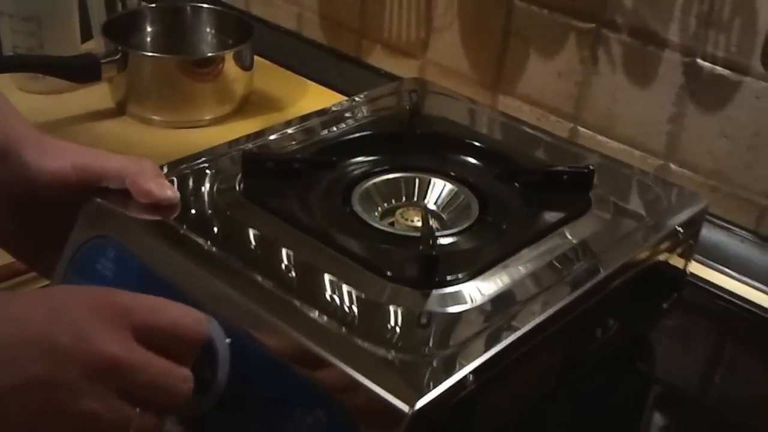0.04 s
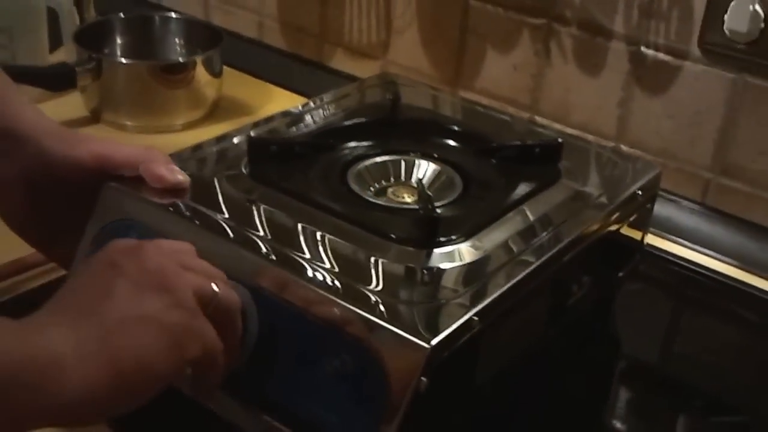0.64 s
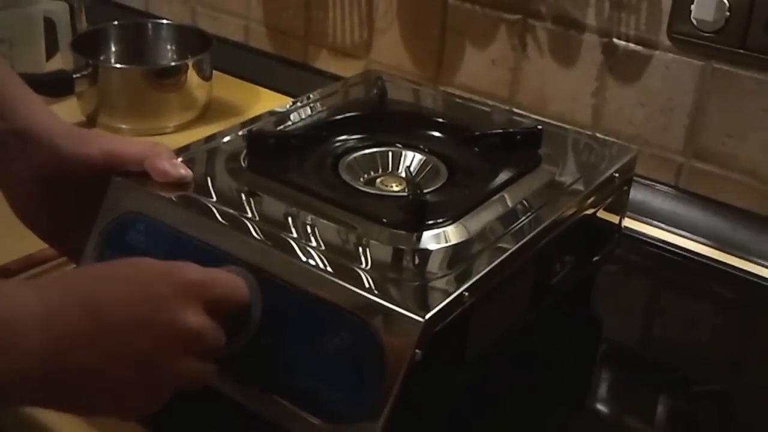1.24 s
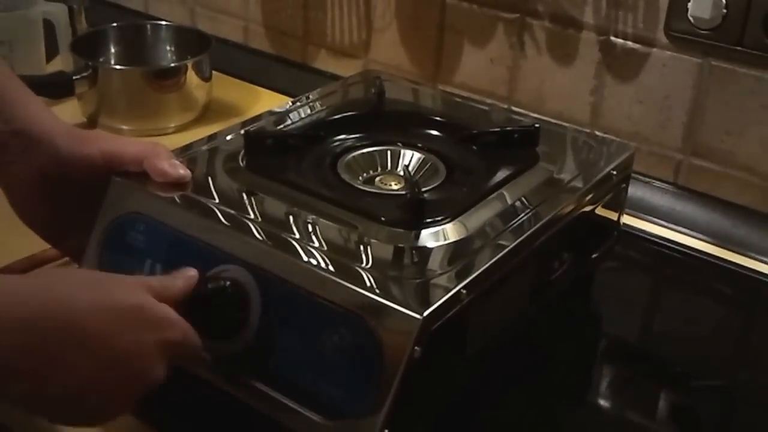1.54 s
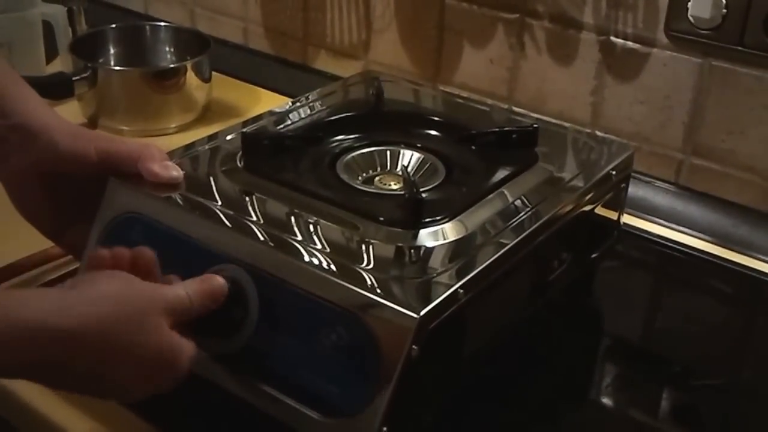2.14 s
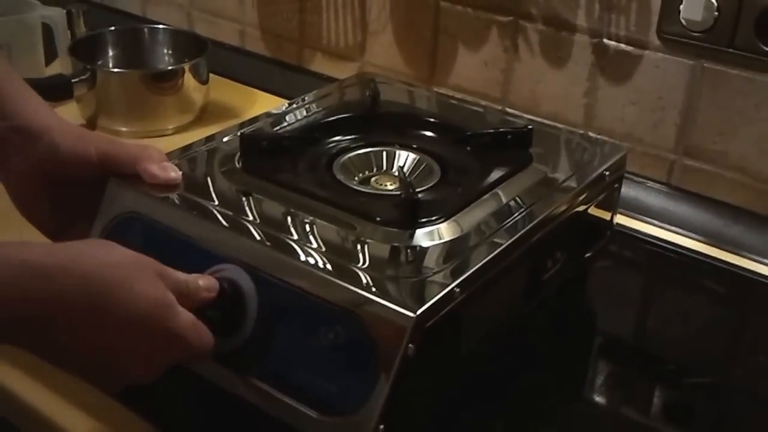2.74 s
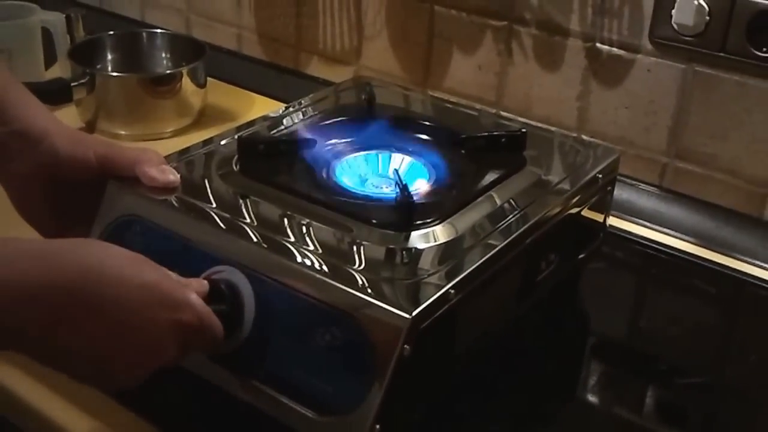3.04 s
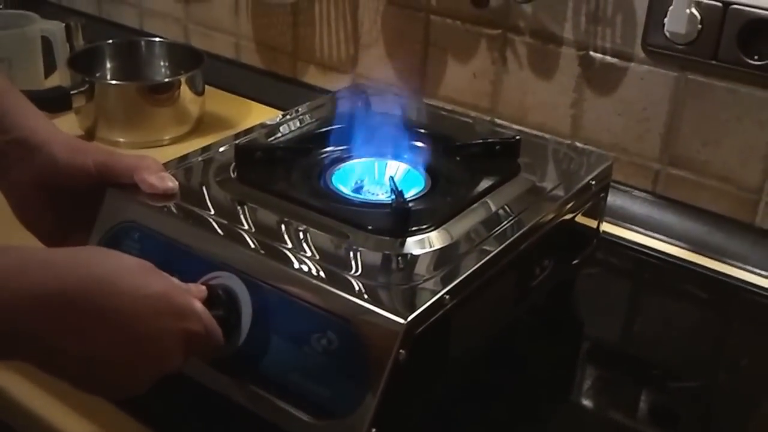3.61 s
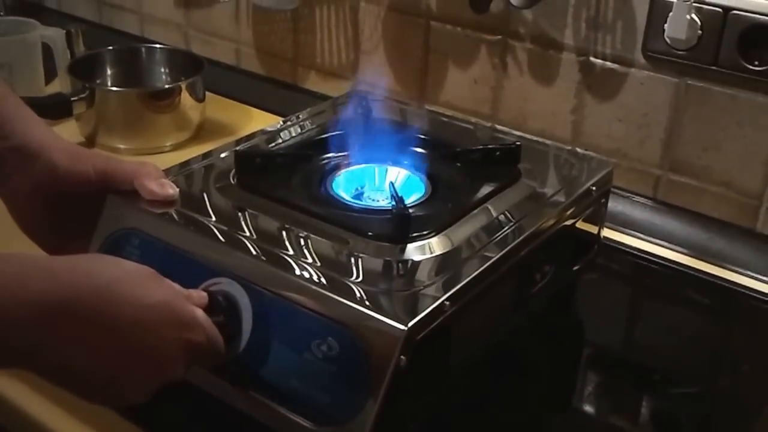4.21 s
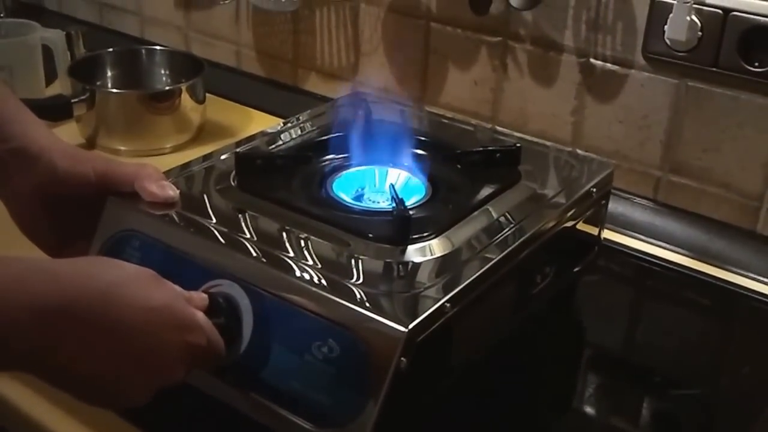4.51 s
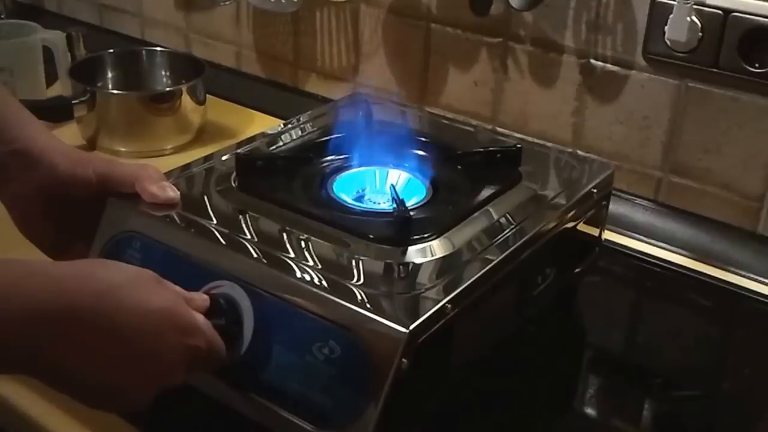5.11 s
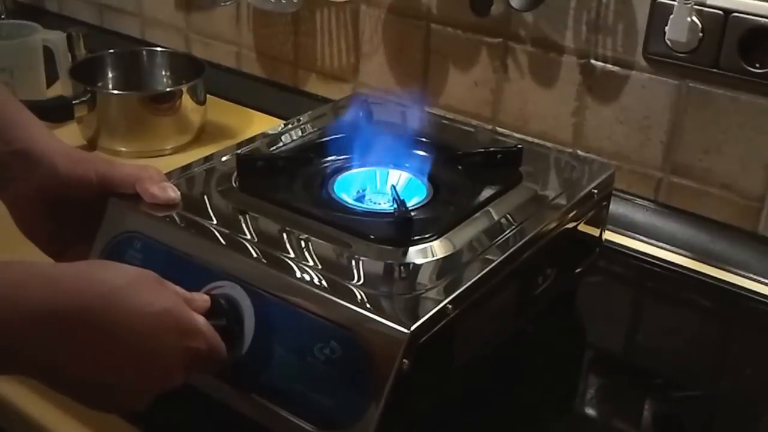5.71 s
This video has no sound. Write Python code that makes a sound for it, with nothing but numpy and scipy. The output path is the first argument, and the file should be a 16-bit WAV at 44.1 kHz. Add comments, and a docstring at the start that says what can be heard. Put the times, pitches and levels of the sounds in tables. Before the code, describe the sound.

Over the faint hum of a small tiled kitchen, fingers rub and turn the plastic knob of a steel gas stove. Light knocks, ticks, springy clicks and rattles come from about 0.3 seconds, bunching around 0.7 to 1 second. At 1.2 seconds a latch clicks and the igniter snaps with a loud, bright crack and a brief steel ring, but nothing lights. From 1.5 to 2.4 seconds the knob softly ticks, rattles and knocks again. Gas starts to hiss at 2.7 seconds. Just before 3 seconds a second snap lights it with a sharp bang, the loudest moment, which overloads the microphone and echoes briefly. The flame flares for an instant and settles into a much quieter, steady, fluttering roar under the high hiss of the gas jet. A faint, thin whistle fades away while the flame keeps burning until the end, near 6 seconds.

```python
"""A tabletop steel gas stove is lit in a small tiled kitchen. A hand works the rattling knob, and the
igniter, a sprung hammer that hits a crystal to make a spark, snaps once in vain. The knob is turned
back and round again, gas starts to hiss, and a second snap lights it with a bang that overloads the
microphone. The flame then burns steadily: a fluttering roar under the hiss of the gas jet."""
import sys
import numpy as np
from scipy import signal
from scipy.fft import rfft, irfft, next_fast_len
from scipy.io import wavfile
from scipy.ndimage import map_coordinates

SR = 44100
rng = np.random.default_rng(int(sys.argv[2]) if len(sys.argv) > 2 else 0)


def wrap_up_sound(samples):
    """Save the sound to the file named by the first command line argument, as 16-bit audio."""
    columns = np.atleast_2d(samples).T
    # keep every value between -1 and 1, then stretch to whole-number steps
    tamed = np.clip(columns, -1, 1)
    steps = np.round(tamed * 32767).astype(np.int16)
    wavfile.write(sys.argv[1], SR, steps)


N = 254016

# the igniter's hammer blows; the last lights the gas: start_s, crack_db, thump_db, ring_db
HAMMER_BLOWS = [(1.1788, -2, -23, -11), (2.959, -3, -23, -8)]
# the notes of the casing's steel panels: pitch_hz, level_db, fade_s
PANEL_NOTES = [(122, -8, .35), (405, 4, .33), (465, 0, .3), (520, -3, .18), (670, -6, .16), (745, 0, .17),
               (785, 0, .14), (905, -8, .1), (1405, -16, .2), (2331, -17, .15)]
# the dull body of the plastic knob's sound: pitch_hz, level_db
KNOB_BODY = [(50, -5), (130, 4), (230, -5), (450, 1.5), (800, 3), (1200, 1.5), (2200, -0.5), (3200, -9),
             (5000, -36)]


def amp(db):
    """Turn decibels into a gain."""
    return 10 ** (np.asarray(db) / 20)


def along(points, hz):
    """Read between (pitch_hz, value) points on a log pitch scale."""
    pitches, values = np.transpose(points)
    return np.interp(np.log(hz + 1), np.log(pitches + 1), values)


def since(start_s):
    """Seconds gone by since start_s, zero before it."""
    return np.maximum(np.arange(N) / SR - start_s, 0)


def rise(start_s, attack_s):
    """A smooth step from 0 to 1."""
    return 1 - np.exp(-since(start_s) / attack_s)


def wobble(rate):
    """A smooth curve through `rate` random values a second."""
    return map_coordinates(rng.standard_normal(int(N * rate / SR) + 4), [np.arange(N) * rate / SR])


def add(track, start_s, sound):
    """Mix a sound into the track at start_s."""
    part = track[round(start_s * SR):][:len(sound)]
    part += sound[:len(part)]


def filtered(sound, response):
    """Scale each pitch in a sound by the gain response(hz)."""
    size = next_fast_len(len(sound) + SR // 4)
    hz = np.fft.rfftfreq(size, 1 / SR)
    return irfft(rfft(sound, size) * response(hz), size)[:len(sound)]


def colour(points):
    """A gain curve through (pitch_hz, level_db) points."""
    return lambda hz: amp(along(points, hz))


def resonances(peaks):
    """A gain curve with a peak at each (pitch_hz, width_hz, level_db)."""
    return lambda hz: sum(amp(db) / (1 + ((hz - centre) / width) ** 2) for centre, width, db in peaks)


def noise(response, size=N):
    """Noise shaped by a gain curve, at an average (rms) strength of 1."""
    shaped = filtered(rng.standard_normal(size), response)
    return shaped / np.sqrt(np.mean(shaped ** 2) + 1e-20)


def burst(response, attack_s, length):
    """A blow and its dense echoes; each pitch dies in `length` times the kitchen's fade time."""
    # how long the kitchen's echoes take to fall by 60 dB: pitch_hz, fade_s
    echo_times = [(100, 0.41), (400, 0.38), (1000, 0.3), (2500, 0.31), (4300, 0.29), (7000, 0.25),
                  (11000, 0.23), (15000, 0.15)]
    size = SR if length > 2 else SR // 2
    hz, t, bands = signal.stft(noise(response, size=size), SR, nperseg=256)
    fade_s = length * along(echo_times, hz)[:, None]
    tail = signal.istft(bands * amp(-60 * t / fade_s), SR, nperseg=256)[1][:size]
    return tail * (1 - np.exp(-np.arange(size) / SR / attack_s))


def ring(notes):
    """Struck metal rings its notes, at slightly new strengths each time; each falls 60 dB in fade_s."""
    hz, db, fade_s = np.transpose(notes)[:, :, None]
    t = np.arange(SR) / SR
    strength = amp(db + rng.standard_normal(db.shape))
    waves = strength * amp(-60 * t / fade_s) * np.sin(2 * np.pi * (hz * t + rng.random(hz.shape)))
    attack_s = .001 + .03 / (1 + (hz / 480) ** 8)  # big low panels take a moment to start moving
    return (waves * (1 - np.exp(-t / attack_s))).sum(0) / np.sqrt(np.sum(strength ** 2) / 2)


def walls(hz):
    """Echoes off the tiles give a steady sound fine peaks and dips, mostly above the bass."""
    spacing_hz, depth_db = 22, 2.3
    ripple = map_coordinates(rng.standard_normal(SR // spacing_hz), [hz / spacing_hz])
    return amp(depth_db * ripple * np.clip(hz / 1000 - .3, 0, 1))


def room_tone():
    """Faint hiss of the kitchen with a low, unsteady hum."""
    # the tone of the quiet room: pitch_hz, level_db
    room_colour = [(20, -4.5), (35, -25), (70, 0), (100, -8), (230, -5.5), (450, -8.5), (580, -14.5),
                   (750, -9.5), (1100, -15), (1300, -16), (2000, -19), (3000, -21.5), (4300, -17.5),
                   (6200, -17.5), (7000, -21.5), (15600, -30)]
    hum = amp(-58) * noise(resonances([(50.6, 4, 0), (100.5, 4.3, -24), (720, 4, -16)]))
    return hum + amp(-52.5) * noise(lambda hz: colour(room_colour)(hz) * walls(hz))


def fingers():
    """A soft rubbing that swells as the fingers grip the knob and fades as they come to rest."""
    # each grip: start_s, length_s, level_db
    grips = [(0.0, 0.2, -61), (0.75, 0.57, -49), (1.403, 1.31, -57.5)]
    # the tone of skin on plastic: pitch_hz, level_db
    skin_colour = [(40, -11.5), (100, -5.5), (450, -6), (750, -8), (1300, -13.5), (3000, -20.5),
                   (4400, -16.5), (6200, -18.5), (8000, -26), (15600, -32.5)]
    attack_s, release_s = .06, .12
    pressure = sum(amp(db) * rise(start_s, attack_s) * np.exp(-since(start_s + length_s) / release_s)
                   for start_s, length_s, db in grips)
    return pressure * noise(lambda hz: colour(skin_colour)(hz) * walls(hz))


def knob():
    """Turning the knob: knocks on the casing, slips of the spring, ticks and plastic rattle."""
    # the knob meets its stops and knocks the casing: start_s, level_db
    knocks = [(0.331, -40.5), (0.8089, -35.5), (0.949, -40.5), (1.831, -37.5), (2.308, -40.5)]
    # the bright edge of the knob's sound: pitch_hz, level_db
    knob_edge = [(2000, -20.5), (3500, 7), (4400, 15), (6200, 2), (8200, -5), (9500, -27), (15700, -22.5)]
    out = np.zeros(N)
    for start_s, db in knocks:
        add(out, start_s, amp(db + 4) * ring(PANEL_NOTES))
        add(out, start_s, amp(db - 8.5) * burst(colour(KNOB_BODY), attack_s=.0012, length=.8))
        add(out, start_s, amp(db - 17) * burst(colour(knob_edge), attack_s=.001, length=.6))

    # the valve's shaft slips against its spring and jolts the knob: start_s, spring_db, jolt_db
    slips = [(0.387, -51, -47.5), (0.745, -49, -48), (0.884, -43.5, -39.5), (0.922, -37, -41.5),
             (1.961, -37.5, -41)]
    # where the spring rings: pitch_hz, width_hz, level_db
    spring_peaks = [(2180, 190, -8.5), (4130, 81, -5.5), (4500, 130, -5.5), (5920, 170, -1),
                    (6190, 170, -4), (8100, 260, -8)]
    for start_s, spring_db, jolt_db in slips:
        add(out, start_s, amp(spring_db) * burst(resonances(spring_peaks), attack_s=.0006, length=.96))
        add(out, start_s, amp(jolt_db) * burst(colour(KNOB_BODY), attack_s=.0028, length=.79))

    # the cam, a lobe on the shaft, ticks with a sharp crack and a softer tail: start_s, level_db
    ticks = [(0.7218, -48.5), (0.827, -42.5), (1.0023, -42), (1.0225, -37), (1.4899, -43)]
    # the tone of a tick: pitch_hz, level_db
    tick_colour = [(1500, -24), (3800, -14), (5200, 0), (6200, -7), (8500, -15), (15000, -24)]
    for start_s, db in ticks:
        add(out, start_s, amp(db + 4.5) * burst(colour(tick_colour), attack_s=.0004, length=.08))
        add(out, start_s, amp(db - 3) * burst(colour(tick_colour), attack_s=.0024, length=.85))

    # the knob rattles on its shaft as the fingers shift: start_s, level_db
    rattles = [(0.715, -43.5), (1.895, -45.5), (1.929, -42), (2.229, -45.5), (2.301, -33), (2.419, -46.5)]
    for start_s, db in rattles:
        add(out, start_s, amp(db) * burst(colour(KNOB_BODY), attack_s=.003, length=.61))
        add(out, start_s, amp(db - 7) * burst(colour(knob_edge), attack_s=.00074, length=.61))
    return out


def igniter():
    """The sprung hammer hits the crystal: a bright crack, a thump in the casing and ringing steel."""
    # the tones of the latch's click, the crack and the thump: pitch_hz, level_db
    latch_colour = [(700, -25), (1800, -8.5), (3000, -13.5), (4300, -4.5), (6200, 1.5), (7200, -6),
                    (8200, 0), (9500, -17), (10500, -10), (12000, -12.5), (13000, -24), (15700, -25)]
    crack_colour = [(200, -26), (700, -16), (1100, -21), (2400, -11), (3100, -17), (4250, 0), (5100, -8),
                    (6000, 0), (7600, 1), (8600, -2), (9400, 1), (10200, -4), (11000, 0), (12500, -9),
                    (15700, -14)]
    thump_colour = [(30, -26), (70, -16), (125, -2), (220, -18.5), (410, 11), (550, -31.5), (740, 24.5),
                    (1000, -30.5), (2500, -39)]
    # pitches that hammer and frame boost in the crack: pitch_hz, width_hz, level_db
    frame_peaks = [(2280, 70, 0), (2590, 50, 1), (5880, 60, -1), (6100, 50, -3), (7900, 90, -4),
                   (9330, 140, -3), (10900, 130, -3), (11450, 110, -3)]
    # the notes of hammer and frame, and of the pan support that rings on: pitch_hz, level_db, fade_s
    steel_notes = [(2342, -13, .2), (2612, -14, .25), (4054, -5, .26), (4086, -5, .24), (4447, -3, .28),
                   (4478, -1, .28), (4502, -4, .28), (5798, -5, .22), (5873, 0, .27), (5908, -2, .27),
                   (6045, -4, .24), (6100, -4, .24), (6280, -6, .28), (6625, -3, .22), (6870, -2, .18),
                   (7935, -4, .23), (9282, -1, .23), (9457, 0, .18), (10878, -3, .18)]
    support_notes = [(3262, -3, 1.3), (3385, -9, 1.1), (4372, -3, 1.4), (4414, -1, .9), (5523, -9, 1),
                     (7811, -11, .9)]

    def crack(hz):
        return colour(crack_colour)(hz) * (1 + resonances(frame_peaks)(hz))

    out = np.zeros(N)
    latch_s = 1.1422  # the latch clicks as it lets go, just before the first blow
    add(out, latch_s, amp(-28) * burst(colour(latch_colour), attack_s=.0012, length=.55))
    for start_s, crack_db, thump_db, ring_db in HAMMER_BLOWS:
        add(out, start_s, amp(crack_db) * burst(crack, attack_s=.00079, length=.96))
        add(out, start_s, amp(thump_db) * burst(colour(thump_colour), attack_s=.001, length=.42))
        # the blow jolts the knob
        add(out, start_s, amp(thump_db - 9) * burst(colour(KNOB_BODY), attack_s=.001, length=.4))
        add(out, start_s, amp(ring_db) * ring(steel_notes))
        add(out, start_s, amp(-28.5) * ring(PANEL_NOTES))
        add(out, start_s, amp(-45.5) * ring(support_notes))
    return out


def ignition():
    """At the last snap the gas in the burner catches with a bang; a slow puff of hot air follows."""
    # the tones of the bang and the deep puff: pitch_hz, level_db
    bang_colour = [(25, -11), (70, -17), (150, -17), (380, -18), (750, -6.5), (1100, -13), (2400, -5.5),
                   (3200, -12.5), (4300, -1.5), (5800, 3.5), (7300, -0.5), (8200, 6), (9300, -8.5),
                   (11500, -7.5), (15700, -12)]
    puff_colour = [(8, 3), (22, -13), (40, -16), (90, -56)]
    out = np.zeros(N)
    lit_s = HAMMER_BLOWS[-1][0]
    add(out, lit_s, amp(-11) * ring(PANEL_NOTES))  # the pressure kicks the casing
    add(out, lit_s, amp(9.5) * burst(colour(bang_colour), attack_s=.003, length=.96))
    add(out, lit_s, amp(-33.5) * burst(colour(puff_colour), attack_s=.012, length=3.9))
    return out


def burner():
    """The gas jet hisses and whistles in its tube; the flame flutters and roars. All follow the flow."""
    # the tones of the jet and the flame: pitch_hz, level_db
    hiss_colour = [(500, -10), (1400, -9.5), (2600, -6.5), (3300, -21), (4300, -6), (5500, 1.5),
                   (7000, -0.5), (7700, -0.5), (8250, 3), (8700, -4.5), (9400, -17), (11000, -17.5),
                   (13300, -36), (15000, -17)]
    roar_colour = [(35, -10), (65, -18), (90, -0.5), (170, -2), (230, -3.5), (450, -1), (700, -3.5),
                   (900, -6), (1200, -6.5), (1600, -5.5), (2300, -8), (3200, -17.5), (4500, -10.5),
                   (9000, -36.5)]
    # the tube that mixes gas with air, and its faint whistle: pitch_hz, width_hz, level_db
    tube_peaks = [(3978, 35, -6), (4395, 30, 1), (4694, 20, -4), (5615, 60, -8), (7709, 30, -4),
                  (7870, 35, -4), (8263, 70, -3)]
    whistle_peaks = [(8255, 60, 0)]
    # the hollows of the stove and the room's corner: pitch_hz, width_hz, level_db
    hollow_peaks = [(124, 16, 14), (170, 9, 3), (203, 8, 4), (238, 9, 4), (285, 7, 18), (338, 9, 15),
                    (385, 7, 9), (404, 7, 12), (480, 9, 13), (505, 10, 6), (562, 14, 2), (622, 18, 1),
                    (705, 12, 6), (765, 9, 2), (812, 12, -1), (1367, 25, -2), (1464, 10, 6), (1498, 10, 3),
                    (1986, 16, 2), (2175, 9, 2), (2299, 12, 2), (2760, 35, 0), (3090, 14, 5)]
    hiss = noise(lambda hz: colour(hiss_colour)(hz) * (1 + resonances(tube_peaks)(hz)) * walls(hz))
    roar = noise(lambda hz: colour(roar_colour)(hz) * (1 + resonances(hollow_peaks)(hz)) * walls(hz))

    # the valve jumps to part of its flow, then eases fully open
    open_s, jump_share = 2.708, .39
    flow = jump_share * rise(open_s, attack_s=.008) + (1 - jump_share) * rise(open_s, attack_s=.088)

    # the flame catches, flares while the pooled gas burns off, and settles
    lit_s = HAMMER_BLOWS[-1][0]
    flare_db, flare_s, whistle_fade_s = 16, .037, 1.5
    lit = rise(lit_s, attack_s=.021)
    flare = 1 + amp(flare_db) * np.exp(-since(lit_s) / flare_s)
    flutter_db = .5 * wobble(5) + .9 * wobble(35)
    flame = lit * flare * amp(-34 + flutter_db) * roar

    whistle = amp(-46.5) * lit * np.exp(-since(lit_s) / whistle_fade_s) * noise(resonances(whistle_peaks))
    jet = amp(-38.5 + .59 * wobble(31)) * hiss
    return flow * (jet + whistle + flame)


def scene():
    """Hand, igniter and burner in the quiet kitchen, on one channel."""
    return (knob() + fingers() + igniter() + ignition() + burner() + room_tone())[None]


def record(dry):
    """Peaks too loud for the microphone are cut flat, and the highest treble is removed."""
    top_hz = 15700
    clipped = np.clip(dry[0], -1, 1)
    return filtered(clipped, lambda hz: 1 / (1 + (hz / top_hz) ** 160))[None]


dry = scene()
out = record(dry)
wrap_up_sound(out)
```